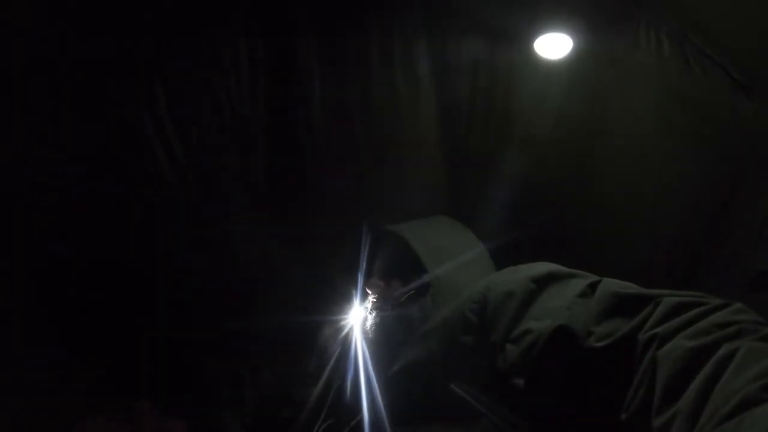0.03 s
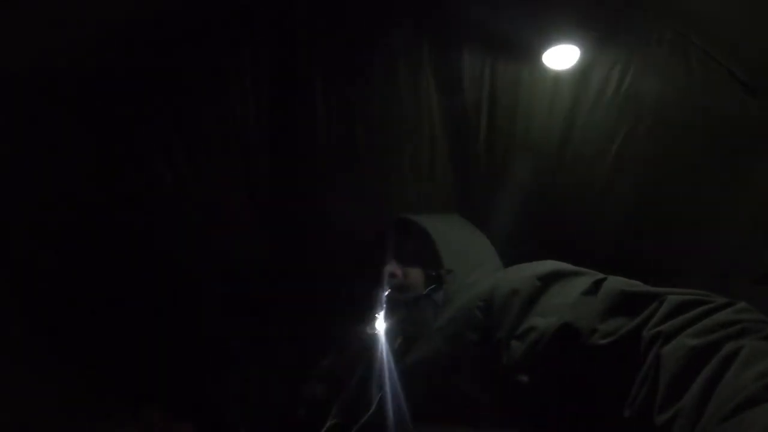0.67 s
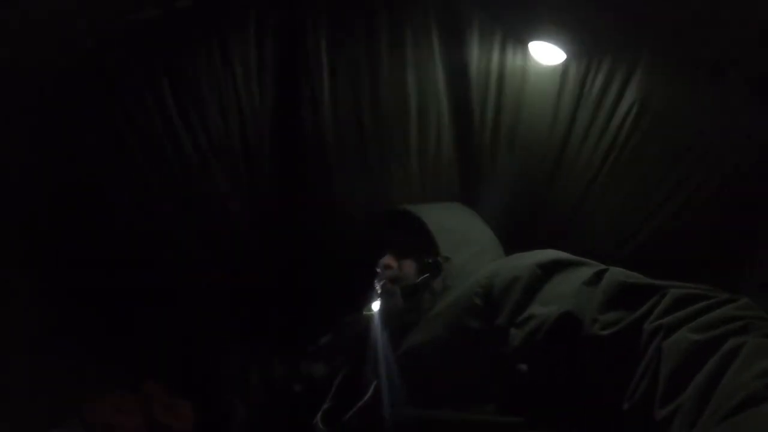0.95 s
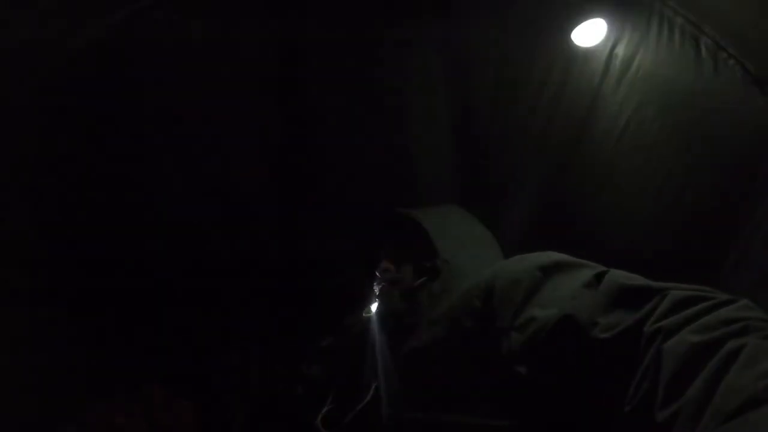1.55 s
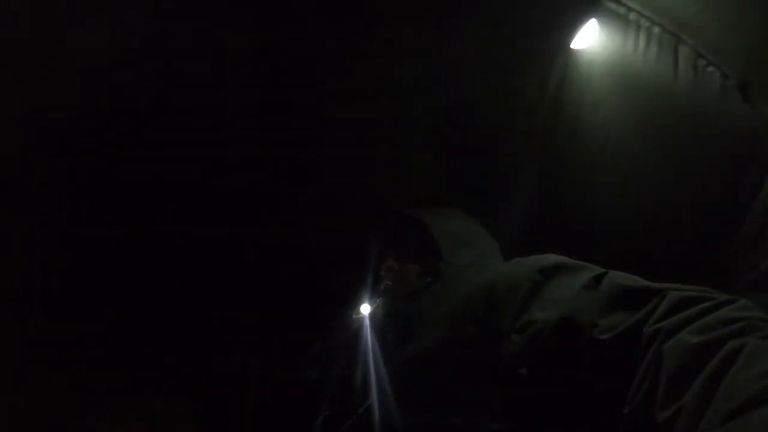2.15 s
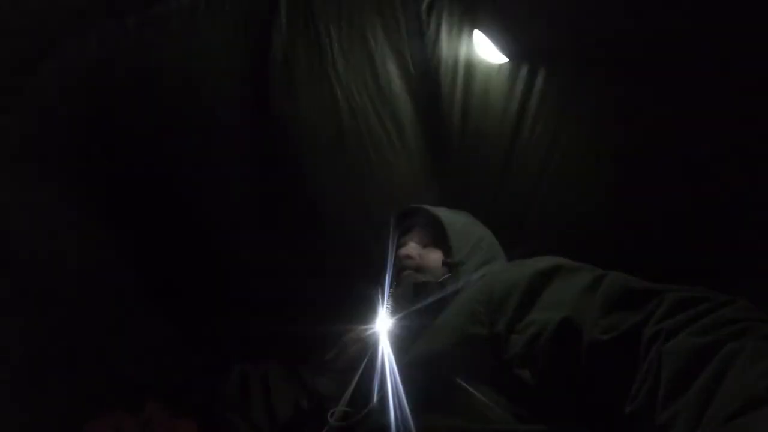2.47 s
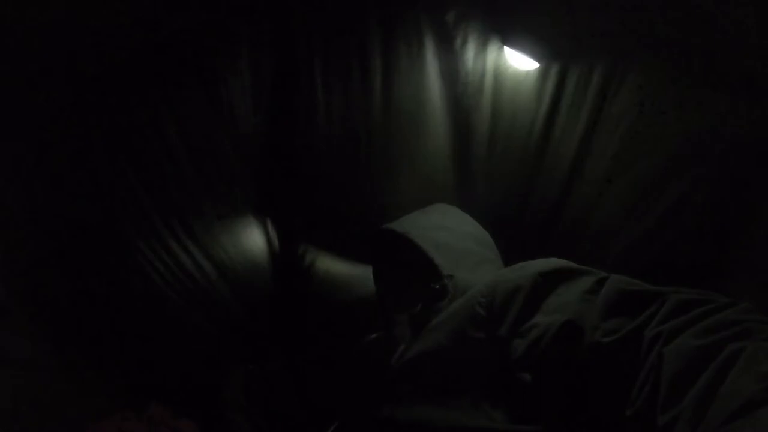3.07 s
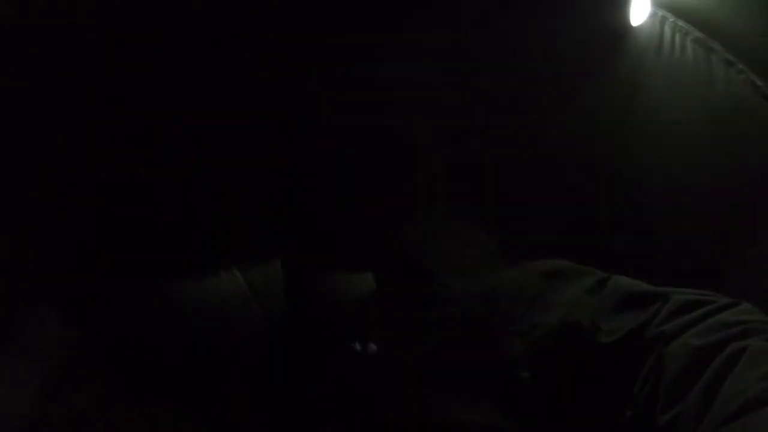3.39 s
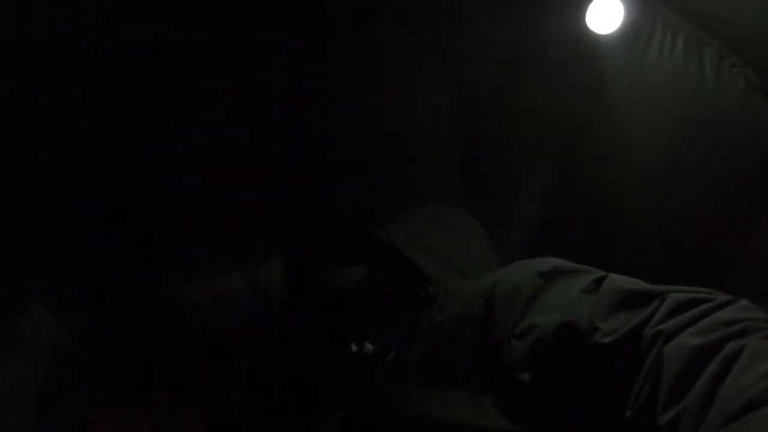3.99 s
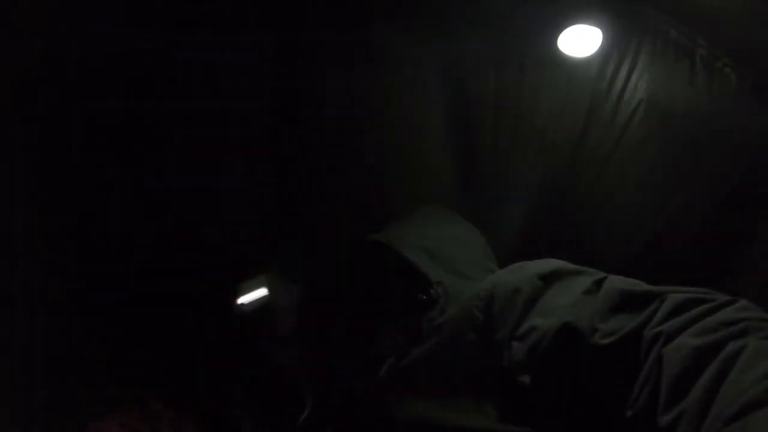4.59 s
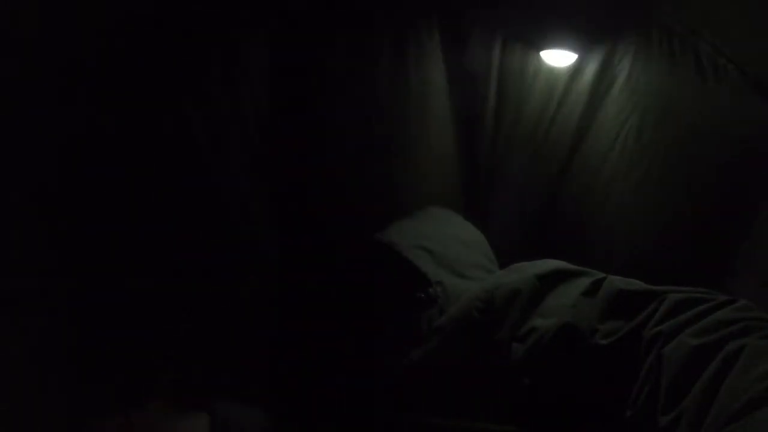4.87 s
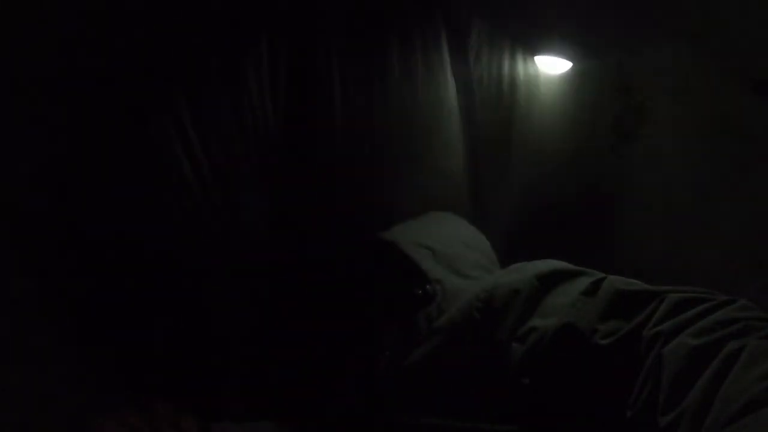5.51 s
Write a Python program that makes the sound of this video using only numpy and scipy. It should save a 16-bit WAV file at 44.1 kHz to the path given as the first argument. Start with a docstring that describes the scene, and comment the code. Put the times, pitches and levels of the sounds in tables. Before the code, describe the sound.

Inside a tent on an open hillside, a gale pumps the walls with a heavy, uneven rumble. The fabric flaps again and again, thumping and throbbing as it fills and pulls tight, with papery ticks and brief swishes of sliding nylon. Flurries come roughly once a second and thin out near the end. A small stereo microphone hears it all from close by.

```python
"""A gale buffets a small tent on an open hillside at night, heard from inside.
Gusts pump the walls and the air between them, which makes a deep rumble. Slack panels flutter,
snap taut and boom, and bulging panels throb. Above that, the nylon crinkles as tiny creases buckle,
swishes as folds slide, and rasps where taut cloth rubs.
A small, closely spaced stereo microphone picks it all up."""
import sys
import numpy as np
from scipy import signal
from scipy.fft import rfft, irfft
from scipy.io import wavfile
from scipy.ndimage import uniform_filter1d, minimum_filter1d

SR = 44100
rng = np.random.default_rng(int(sys.argv[2]) if len(sys.argv) > 2 else 0)


def materialize(psi):
    """Save the field psi as 16-bit PCM at rate SR to the path in sys.argv[1].

    A 1-D psi becomes a single channel; in a 2-D psi each row is a channel.
    """
    bounded = np.clip(np.atleast_2d(psi).T, -1, 1)
    quanta = np.round(bounded * 32767).astype(np.int16)
    wavfile.write(sys.argv[1], SR, quanta)


N = 253461
TIME = np.arange(N) / SR
FREQS = np.maximum(np.fft.rfftfreq(N, 1 / SR), 1)

# Levels in the tables are relative: gains and filters act on them later.
# how hard the wind pushes on the tent (time [s], level [dB])
WIND_PUSH = [(0.0, -17.5), (0.24, -17), (0.7, -16.5), (0.81, -19.5), (1.35, -16), (1.55, -25.5),
             (1.73, -17.5), (1.8, -27), (2.06, -14), (2.45, -15), (2.62, -19.5), (2.8, -17.5), (3.1, -15.5),
             (3.4, -18.5), (3.72, -13.5), (3.94, -18.5), (4.56, -16), (4.65, -22.5), (4.68, -17.5),
             (4.94, -24), (5.21, -16.5), (5.6, -16), (5.64, -22.5), (5.7, -12)]
# tone of the swaying tent (frequency [Hz], level [dB])
SWAY_TONE = [(4, -20), (11, -8), (22, -1), (32, 1.2), (44, -1), (58, -2), (74, -7)]
# tone of the drumming panels (frequency [Hz], level [dB])
DRUM_TONE = [(60, 2.5), (72, -17), (85, 1), (110, -2), (135, -6.5), (160, -16), (200, -17)]
# a panel snaps taut (time [s], thud level [dB], thud pitch [Hz], boom level [dB])
SNAPS = [(0.076, -30, 560, -34), (0.202, -11, 287, -33), (0.375, -17.5, 267, -21), (0.398, -21.5, 283, -18),
         (0.438, -14, 365, -31), (0.633, -17, 474, -12), (0.866, -19.5, 375, -14),
         (1.005, -18.5, 327, -9.5), (1.05, -19, 397, -13.5), (1.075, -25, 275, -12.5),
         (1.112, -10, 313, -30), (1.168, -8.5, 321, -18.5), (1.341, -10.5, 314, -28),
         (1.362, -11.5, 463, -21.5), (1.42, -33, 403, -35.5), (1.678, -23.5, 338, -22.5),
         (1.94, -17, 322, -20), (1.969, -21, 433, -9), (2.012, -20.5, 360, -14.5),
         (2.065, -9.5, 405, -13.5), (2.078, -8, 480, -29), (2.098, -24, 406, -18.5),
         (2.115, -16, 397, -28.5), (2.183, -15.5, 323, -13), (2.204, -14.5, 403, -17.5),
         (2.223, -9.5, 301, -22), (2.248, -13, 325, -16), (2.285, -18, 290, -16),
         (2.338, -11.5, 376, -26.5), (2.422, -16.5, 380, -37), (2.702, -24, 426, -25.5),
         (2.893, -20, 296, -12), (3.019, -14.5, 560, -27), (3.024, -7.5, 396, -13.5),
         (3.127, -20.5, 348, -33.5), (3.16, -16, 457, -31), (3.252, -14.5, 530, -25.5),
         (3.374, -18, 332, -33), (3.456, -27.5, 268, -16.5), (3.789, -22, 418, -18.5),
         (3.815, -24, 282, -26), (3.888, -20, 267, -15), (3.999, -21, 263, -15.5), (4.156, -16, 287, -16.5),
         (4.188, -19, 580, -24), (4.329, -22, 332, -10.5), (4.412, -29.5, 414, -14.5),
         (4.445, -6.5, 495, -9.5), (4.468, -18.5, 524, -13), (4.575, -28.5, 293, -9),
         (4.68, -20, 300, -21.5), (4.817, -26.5, 322, -15.5), (5.165, -24.5, 320, -12.5),
         (5.405, -21.5, 270, -17), (5.486, -22, 314, -29)]
# the broad, middle and narrow push of air in a thud (pitch [ratio], strength [ratio])
THUD_PUSHES = [(.45, .4), (1, .75), (1.8, .25)]
# the air in the tent lets a snap boom and swallows its treble (frequency [Hz], gain [dB])
TENT_AIR = [(20, -5), (150, 1), (300, 0.5), (430, -2), (650, 0.5), (820, -4), (1050, -8.5), (1500, -3)]
# a bulging panel throbs (middle time [s], half length [s], level [dB], pitch [Hz])
BULGES = [(0.16, 0.049, -16, 119), (0.219, 0.037, -16.5, 73.4), (0.262, .035, -14.5, 121),
          (0.39, 0.025, -19.5, 103), (1.161, 0.031, -8.5, 97.2), (1.276, 0.06, -19.5, 104),
          (1.731, 0.039, -15.5, 77.8), (1.965, 0.032, -18, 88.5), (2.069, 0.045, -7.5, 72.6),
          (2.306, 0.056, -9, 87.3), (2.547, 0.025, -18.5, 119.5), (2.706, 0.096, -17.5, 74.3),
          (3.254, 0.052, -13, 72.2), (3.569, 0.043, -15, 116.3), (3.757, 0.056, -17, 112),
          (3.872, 0.1, -16.5, 74), (4.515, .035, -16.5, 122), (5.281, 0.059, -19.5, 119),
          (5.42, 0.07, -12.5, 118.2)]
# tone of rippling slack cloth (frequency [Hz], level [dB])
RIPPLE_TONE = [(150, 5), (185, 2), (240, 4), (330, -3), (440, -6), (640, -11), (800, -19.5), (1050, -30.5)]
# brighter tone of cloth clapping the air (frequency [Hz], level [dB])
CLAP_TONE = [(220, -8.5), (330, -14.5), (450, -4.5), (680, -3.5), (850, -14), (1100, -23)]
# tone of the crinkle and swish (frequency [Hz], level [dB])
NYLON_TONE = [(400, -42), (750, 6), (1100, -1.5), (1600, -3), (2200, -3), (2700, -8), (3200, -6),
              (4400, -15.5), (5300, -16.5), (6200, -12.5), (7900, -18), (9100, -14.5), (10500, -21.5),
              (14800, -38.5)]
# how much the loose nylon stirs between snaps (time [s], level [dB])
STIRRING = [(0.0, -52), (0.21, -62), (0.86, -60), (1.09, -48), (1.22, -54.5), (1.38, -56), (1.54, -64),
            (1.66, -57.5), (1.78, -66.5), (1.97, -58.5), (2.11, -56), (2.28, -47.5), (2.43, -56),
            (2.58, -61), (2.94, -63.5), (3.06, -56.5), (3.28, -56.5), (3.45, -55.5), (3.66, -61),
            (3.91, -62), (4.16, -58), (4.3, -51), (4.45, -44.5), (4.6, -51), (4.82, -65), (4.97, -62.5),
            (5.11, -68), (5.24, -73), (5.7, -65.5)]
# how fast the cloth shivers (rate [Hz], level [dB])
SHIVER_RATES = [(14, 0), (45, -1), (90, -6), (200, -22)]
# a fold whips or slides across the cloth (start [s], length [s], crinkle [dB], swish [dB])
SLIDES = [(0.073, 0.005, -42, -56), (0.147, 0.012, -49.5, -62), (0.164, 0.058, -51, -61),
          (0.378, 0.007, -43, -60), (0.439, 0.022, -46, -60), (0.617, 0.017, -45.5, -52),
          (0.794, 0.0074, -51.5, -56.5), (0.867, 0.01, -47, -50.5), (0.943, 0.0086, -77, -50),
          (0.989, 0.02, -44.5, -54), (1.026, 0.009, -37.5, -47), (1.042, 0.015, -37, -38),
          (1.07, 0.0044, -41.5, -39.5), (1.194, 0.0065, -44.5, -58), (1.268, 0.025, -44, -54),
          (1.299, 0.049, -45, -52.5), (1.675, 0.0063, -40, -49.5), (1.701, 0.017, -45, -47),
          (1.726, 0.007, -42, -43), (1.744, 0.0048, -45, -43.5), (1.93, 0.02, -41, -44),
          (1.941, 0.028, -39, -44.5), (2.047, 0.043, -44, -52.5), (2.148, 0.06, -40, -45),
          (2.317, 0.011, -55, -63), (2.331, 0.017, -49, -51.5), (2.429, 0.008, -50, -56),
          (2.46, 0.024, -46.5, -62), (2.627, 0.017, -60, -60), (2.645, 0.058, -52, -58),
          (2.805, 0.037, -53, -59), (2.837, 0.065, -51, -53.5), (2.975, 0.023, -43.5, -48),
          (3.013, 0.012, -40.5, -48.5), (3.054, 0.0061, -49, -50), (3.08, 0.017, -52, -56),
          (3.125, 0.0075, -43.5, -56), (3.143, 0.011, -53, -54), (3.191, 0.0047, -41.5, -54),
          (3.235, 0.023, -44, -54.5), (3.3, 0.03, -51, -56.5), (3.356, 0.029, -49.5, -58),
          (3.453, 0.013, -47.5, -55), (3.524, 0.04, -50, -57), (3.708, 0.047, -46, -59),
          (3.754, 0.064, -43, -47.5), (3.876, 0.019, -47.5, -54), (4.03, 0.013, -74, -60),
          (4.116, 0.015, -45, -45), (4.125, 0.055, -41, -45.5), (4.265, 0.0098, -53, -50.5),
          (4.319, 0.013, -37, -43.5), (4.41, 0.012, -39, -45.5), (4.438, 0.016, -34, -37.5),
          (4.464, 0.0065, -43, -40.5), (4.548, 0.019, -47.5, -48), (4.68, 0.046, -57, -61),
          (4.81, 0.011, -56, -60.5), (4.843, 0.017, -63, -53), (5.001, 0.012, -52, -68),
          (5.145, 0.015, -52, -69), (5.345, 0.04, -59.5, -65.5), (5.41, 0.05, -51, -66),
          (5.578, 0.008, -57, -78)]
# one crease buckles with a papery tick (time [s], level [dB], fizz pitch [Hz])
CREASE_TICKS = [(0.076, -38, 1290), (0.077, -44.5, 3180), (0.384, -51.5, 6240), (0.513, -48, 2000),
                (0.631, -42, 1570), (0.85, -49, 1520), (0.868, -46.5, 7250), (1.021, -33.5, 1700),
                (1.679, -52, 5500), (1.931, -40, 2190), (2.334, -48, 2620), (2.682, -61, 2270),
                (2.983, -44.5, 3180), (3.021, -41, 1310), (3.049, -44, 2100), (3.192, -62, 1890),
                (3.245, -59, 1910), (3.884, -47, 1800), (4.409, -37, 2100), (4.444, -41, 1600),
                (5.148, -62.5, 3200), (5.292, -63, 6250)]
# taut cloth rubs with a hoarse rasp (start [s], length [s], level [dB], pitch [Hz])
RASPS = [(0.418, 0.011, -50.5, 1640), (2.834, 0.014, -55, 2120), (5.285, 0.03, -62, 1840),
         (5.346, 0.057, -58.5, 1890), (5.422, 0.021, -66, 1660)]
# how the left channel hears, against the right (frequency [Hz], gain [dB], phase [rad])
LEFT_RESPONSE = [(40, -2.9, -.3), (130, -5.6, -.4), (300, -13.3, -.7), (390, -20.6, -1.2),
                 (440, -20.9, -2.7), (520, -15.9, -3.3), (650, -9.9, -3.6), (1000, -2.1, -3.9),
                 (2000, 0, -4.4), (3300, 0, -4.8), (4600, -9, -5.4), (9000, -10, -5.4), (12000, -2.5, -5.4)]

USUAL_WIND_DB, USUAL_SNAP_DB, USUAL_STIR_DB = -19, -17, -60  # middling levels


def rumble(sway_db=-1, drum_db=-25, drum_slope=.6, billow_db=-11):
    """Gusts pump the tent like a bellows and drum on its stretched panels, hardest at each snap."""
    sway = even(colour(rng.standard_normal(N), SWAY_TONE), seconds=.04) * eddies(16, depth_db=3)
    drum = even(colour(rng.standard_normal(N), DRUM_TONE), seconds=.03) * eddies(22, depth_db=2.1)
    wind_db = curve(WIND_PUSH)
    wind_power = undb(drum_db + drum_slope * (wind_db - USUAL_WIND_DB)) ** 2
    snap_power = undb(billow_db) ** 2 * billows(fade_s=.39)
    return sway * undb(wind_db + sway_db) + drum * np.sqrt(wind_power + snap_power)


def eddies(per_second, depth_db):
    """A gain that wanders up and down as swirls of air pass."""
    size = int(SR / per_second)
    steps = np.repeat(rng.standard_normal(1000), size)[:N]
    return undb(depth_db * unit(smooth(steps, size)))


def billows(fade_s):
    """Power of the moving panels: each fills with air before its snap and rings on after it."""
    return sum((undb(db) * burst(at, 0, rise_s=.017, fade_s=fade_s)) ** 2 for at, db, *_ in SNAPS)


def snaps(rebound=.35, rebound_s=.006):
    """Each panel snaps taut, then bounces back a moment later, more weakly."""
    out = np.zeros(N)
    for (at, db, hz, _), (late, slack) in zip(SNAPS, rng.uniform(.6, 1.1, (len(SNAPS), 2))):
        out += undb(db) * (thud(at, hz) - rebound * thud(at + rebound_s * late, hz * slack))
    return irfft(rfft(out) * spectrum(TENT_AIR), N)


def thud(at, hz):
    """Cloth stopped dead gives one pointed push of air between two shallow dips."""
    near = np.abs(TIME - at) < .02
    out = np.zeros(N)
    for ratio, strength in THUD_PUSHES:
        offset = np.pi * hz * ratio * (TIME[near] - at)
        out[near] += strength * (1 - 2 * offset ** 2) * np.exp(-offset ** 2)
    return out


def booms(usual_hz=128.5, rise_s=.0093, fade_s=.1, octaves_per_db=.05):
    """A slapped panel swings at its own low pitch; a harder slap stretches it to a higher one."""
    out = np.zeros(N)
    for (at, db, _, boom_db), detune in zip(SNAPS, rng.uniform(-.08, .08, len(SNAPS))):
        hz = usual_hz * (1 + detune) * 2 ** (octaves_per_db * (db - USUAL_SNAP_DB))
        near = np.abs(TIME - at) < .2
        age = TIME[near] - at
        swing = np.exp(np.minimum(age / rise_s, -np.log(1000) * age / fade_s))
        out[near] += undb(boom_db) * swing * np.cos(2 * np.pi * hz * age)
    return out


def throbs(gain_db=-1, sag=.07):
    """The wind leans on a panel, which swings up and dies away; its pitch sags as the push eases."""
    out = np.zeros(N)
    for (at, half_length, db, hz), phase in zip(BULGES, rng.uniform(0, 2 * np.pi, len(BULGES))):
        near = np.abs(TIME - at) < half_length
        age = TIME[near] - at
        swell = np.cos(np.pi / 2 * age / half_length) ** 2
        cycles = hz * age * (1 - sag * age / half_length / 2)
        out[near] += undb(db + gain_db) * swell * np.cos(2 * np.pi * cycles + phase)
    return out


def flutter(steady_db=-37.5, billow_db=-15.5, slide_db=8, clap_db=-21, slide_clap_db=4):
    """Wind, snaps and sliding folds send ripples through slack cloth, ending in pats and claps."""
    pats = grains(per_second=400, spread_db=2.5) + .7 * rng.standard_normal(N)
    wind_db = curve(WIND_PUSH) - USUAL_WIND_DB
    stir_db = curve(STIRRING) - USUAL_STIR_DB
    steady = undb(steady_db + .83 * wind_db + .34 * stir_db) * eddies(24.84, depth_db=3.5)
    folds = sliding_folds()[0]
    ripple_power = steady ** 2 + undb(billow_db) ** 2 * billows(fade_s=.28) + undb(slide_db) ** 2 * folds
    clap_power = undb(clap_db) ** 2 * billows(fade_s=.13) + undb(slide_clap_db) ** 2 * folds
    ripples = even(colour(pats, RIPPLE_TONE), seconds=.018)
    claps = even(colour(grains(per_second=500, spread_db=3), CLAP_TONE), seconds=.018)
    return ripples * np.sqrt(ripple_power) + claps * np.sqrt(clap_power)


def nylon():
    """Tiny creases buckle in swarms and cloth slides on cloth: spectra of the crinkle and the swish."""
    crinkle_power, swish_power = nylon_power()
    speed_db = 10 * np.log10(swish_power)  # a louder swish stands for faster cloth
    shiver = undb(1.1 * unit(colour(rng.standard_normal(N), SHIVER_RATES)))
    crinkle = rustle(per_second=2200, spread_db=3.2) * shiver * np.sqrt(crinkle_power)
    swish_pair = np.array([rustle(per_second=3500, spread_db=3) for _ in range(2)])
    swish = swish_pair * shiver * np.sqrt(swish_power)
    return (dull_when_slow(crinkle, speed_db, edge_hz=2540, fast_db=-45.5, slope=.27),
            dull_when_slow(swish, speed_db, edge_hz=8500, fast_db=-63.5, slope=.47))


def nylon_power(crinkle_db=-55.5, swish_db=-63, jerk_crinkle_db=-35, jerk_swish_db=-43):
    """Power of the crinkle and the swish, from stirring, sliding folds and the jerk of each snap."""
    stir_db = curve(STIRRING) - USUAL_STIR_DB
    steady = undb([crinkle_db + .77 * stir_db, swish_db + .84 * stir_db]) * eddies(28, depth_db=1.8)
    jerks = sum((undb(db) * burst(at, 0, rise_s=.002, fade_s=.036)) ** 2 for at, db, *_ in SNAPS)
    return steady ** 2 + sliding_folds() + np.outer(undb([jerk_crinkle_db, jerk_swish_db]) ** 2, jerks)


def sliding_folds(long_slide_s=.1, creep_db=-6.5):
    """Power of the crinkle and the swish as each fold creeps quietly, lets go and settles."""
    power = np.zeros((2, N))
    for start, length, crinkle_db, swish_db in SLIDES:
        swell_s = length * min(length / long_slide_s, 1)  # a short whip starts almost at once
        speed = np.clip((TIME - start) / swell_s, undb(creep_db), 1)
        slide = speed * burst(start, length, rise_s=.34 * length, fade_s=.047 + 3.6 * length)
        power += np.outer(undb([crinkle_db, swish_db]), slide) ** 2
    return power


def rustle(per_second, spread_db):
    """Many tiny clicks of cloth over a hiss, held at a steady level."""
    return even(grains(per_second, spread_db) + .7 * rng.standard_normal(N), seconds=.015)


def dull_when_slow(x, speed_db, edge_hz, fast_db, slope):
    """Only fast cloth keeps all its treble above the edge. Returns a spectrum."""
    treble = irfft(rfft(x) / (1 + (edge_hz / FREQS) ** 16), N)
    treble_gain = undb(slope * np.minimum(speed_db - fast_db, 0))
    return rfft(x + treble * (treble_gain - 1))


def creases(size=4096, fizz_fade_s=.045, crack_s=.0018):
    """A crease gives way with a dull crack, and its neighbours fizz for an instant."""
    out = np.zeros(N + size)
    age = np.arange(size) / SR
    for (at, db, hz), noise in zip(CREASE_TICKS, rng.standard_normal((len(CREASE_TICKS), size))):
        fizz = band(noise * undb(-60 * age / fizz_fade_s), hz, spread=1.35)
        crack = band(1.1 * noise * np.exp(-age / crack_s), .65 * hz, spread=1.6)
        start = int(at * SR)
        out[start:start + size] += undb(db) * (fizz + crack)
    return out[:N]


def rubs(glide=.094):
    """Taut cloth sticks and slips; the pitch of its narrow rasp climbs as it tightens."""
    out = np.zeros(N)
    catches = grains(per_second=2500, spread_db=2)
    for start, length, db, hz in RASPS:
        pitch_ratio = 1 + glide * (np.clip((TIME - start) / length, 0, 1) - .5)
        rasp = band(catches, hz, spread=1.18)
        rising = np.interp(np.cumsum(pitch_ratio), np.arange(N), rasp, period=N)
        out += undb(db) * even(rising, seconds=.02) * burst(start, length, rise_s=.004, fade_s=.08)
    return out


def wall_echoes(count=8, strength=.1, reflect_hz=2200):
    """Thin walls bounce back mostly treble; their quick echoes give a rippled gain per frequency."""
    delays_s = rng.uniform(.0015, .014, count)
    echoes = np.exp(-2j * np.pi * np.outer(delays_s, FREQS)).sum(axis=0)
    return 1 + strength * echoes * FREQS / np.hypot(FREQS, reflect_hz)


def undb(db):
    """Turn decibels into a gain."""
    return 10 ** (np.asarray(db) / 20)


def curve(table):
    """Join the points of a table of times with straight lines."""
    return np.interp(TIME, *np.array(table).T)


def response(table, column=1):
    """Join the points of a table of frequencies, giving each octave equal room."""
    rows = np.array(table)
    return np.interp(np.log(FREQS), np.log(rows[:, 0]), rows[:, column])


def spectrum(table):
    """Gain per frequency, falling steeply beyond the ends of the table."""
    outside = np.maximum(np.maximum(table[0][0] / FREQS, FREQS / table[-1][0]), 1)
    return undb(response(table)) / outside ** 10


def unit(x):
    """Scale to an average (rms) level of 1."""
    return x / np.sqrt(np.mean(x ** 2))


def colour(x, table):
    """Give a sound the tone in a table; white noise keeps its power."""
    return irfft(rfft(x) * unit(spectrum(table)), N)


def band(x, hz, spread):
    """Keep a band around a pitch; white noise keeps about the same power."""
    low, high = hz / spread, min(hz * spread, .45 * SR)
    bandpass = signal.butter(2, [low, high], "bandpass", fs=SR, output="sos")
    return signal.sosfilt(bandpass, x) * np.sqrt(SR / 2 / (high - low))


def smooth(x, size):
    """Average twice over `size` samples."""
    return uniform_filter1d(uniform_filter1d(x, size), size)


def even(x, seconds):
    """Hold the level near 1, ironing out swells slower than the given time."""
    return x / np.sqrt(smooth(x ** 2, int(seconds * SR)) + 1e-12)


def grains(per_second, spread_db):
    """Clicks at random moments: many small, a few large."""
    hit = rng.random(N) < per_second / SR
    size = undb(spread_db * np.minimum(rng.exponential(size=N), 4))
    return unit(hit * size * rng.choice([-1, 1], N))


def burst(start, length, rise_s, fade_s):
    """A gain that rises until the start, holds for its length, then drops 60 dB in fade_s."""
    out = np.zeros(N)
    near = slice(*np.searchsorted(TIME, [start - 10 * rise_s, start + length + 2 * fade_s]))
    age = TIME[near] - start
    out[near] = np.exp(np.minimum(age, 0) / rise_s - np.log(1000) * np.maximum(age - length, 0) / fade_s)
    return out


def scene(split_hz=4100, scatter=.3):
    """Both channels share the low sounds; the swish comes from all the walls, so each gets its own."""
    crinkle, swish = nylon()
    # part of the crinkle is scattered on its way to the left channel
    scattered = scatter * rfft(irfft(crinkle, N) * rng.standard_normal(N))
    below_split = 1 / np.sqrt(1 + (FREQS / split_hz) ** 14)
    crinkle_tone = unit(spectrum(NYLON_TONE) * below_split)
    swish = swish * unit(spectrum(NYLON_TONE) * np.sqrt(1 - below_split ** 2))
    cloth = crinkle * crinkle_tone + rfft(creases() + rubs())
    buffeting = rfft(rumble() + flutter() + snaps() + booms() + throbs())
    left_filter = undb(response(LEFT_RESPONSE)) * np.exp(1j * response(LEFT_RESPONSE, column=2))
    left = left_filter * (buffeting + (cloth + scattered * crinkle_tone + swish[0]) * wall_echoes())
    right = buffeting + (cloth + swish[1]) * wall_echoes()
    return irfft(np.array([left, right]), N)


def record(dry, ceiling_db=-6.5, hold_s=.003, top_hz=15400):
    """A limiter turns both channels down at the loudest buffets, and a filter cuts the top treble."""
    hold = int(hold_s * SR)
    needed_gain = 1 / np.maximum(np.abs(dry).max(axis=0) / undb(ceiling_db), 1)
    gain = uniform_filter1d(minimum_filter1d(needed_gain, hold), 2 * hold)
    fade_in = np.minimum(TIME / .004, 1)
    lowpass = signal.ellip(8, .2, 70, top_hz, fs=SR, output="sos")
    return signal.sosfilt(lowpass, dry * gain * fade_in)


dry = scene()
out = record(dry)
materialize(out)
```